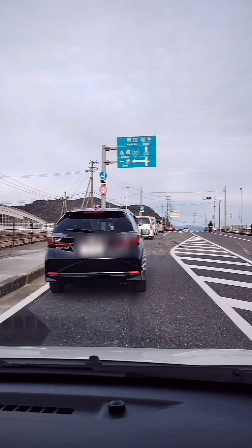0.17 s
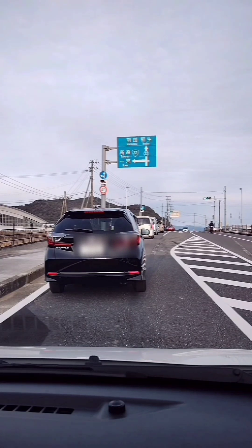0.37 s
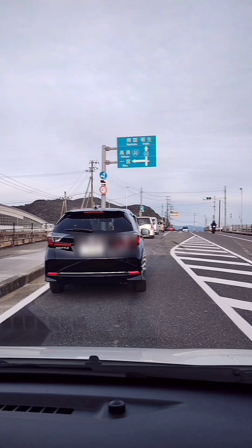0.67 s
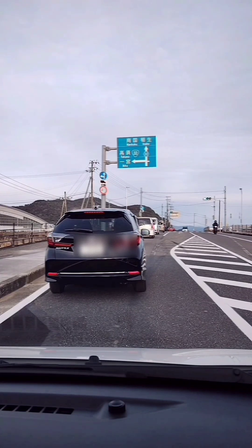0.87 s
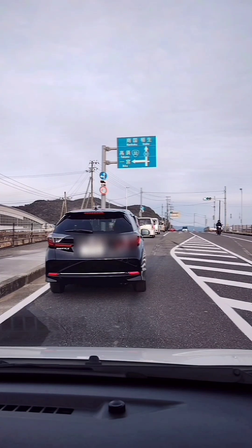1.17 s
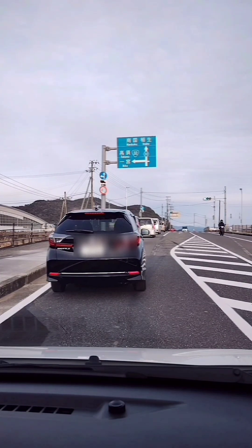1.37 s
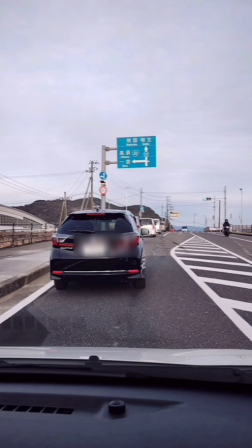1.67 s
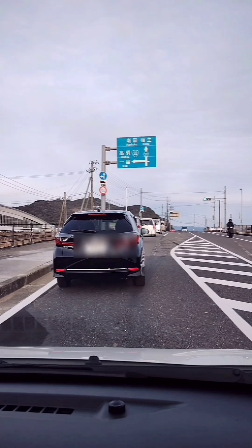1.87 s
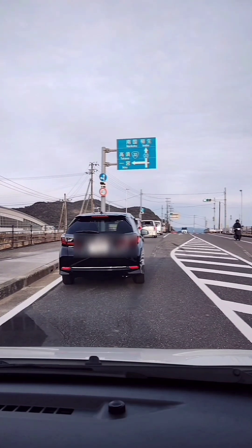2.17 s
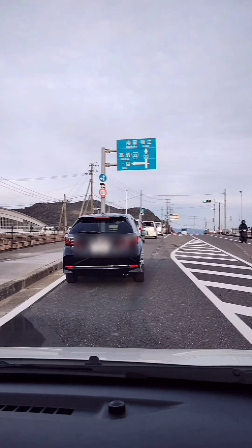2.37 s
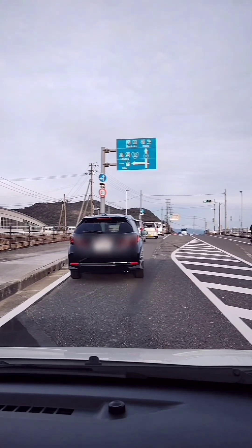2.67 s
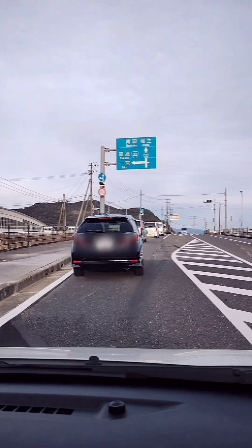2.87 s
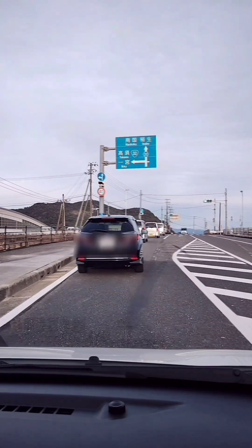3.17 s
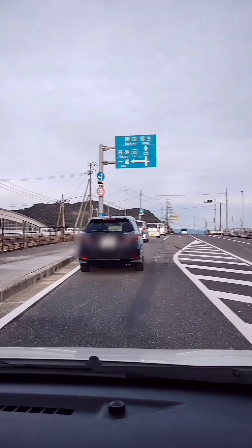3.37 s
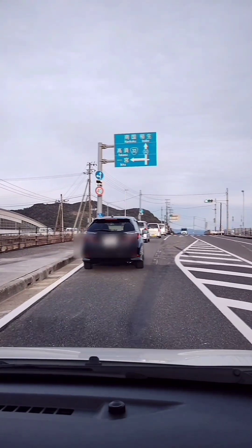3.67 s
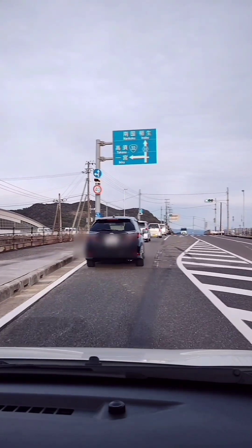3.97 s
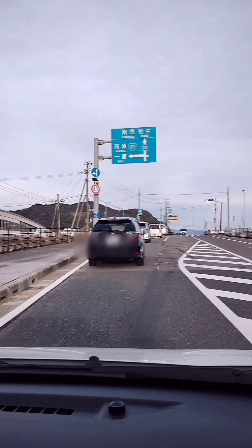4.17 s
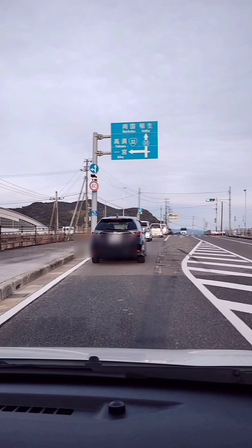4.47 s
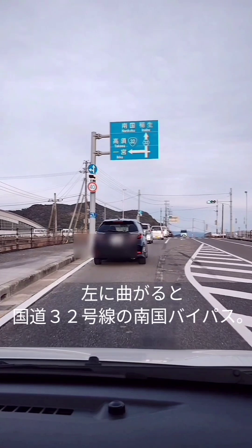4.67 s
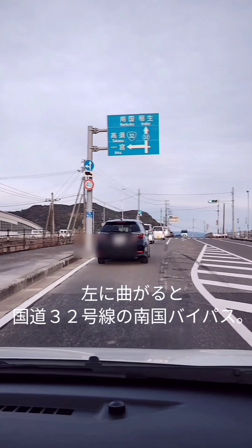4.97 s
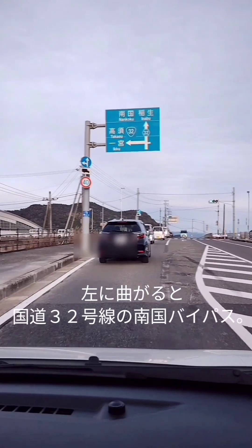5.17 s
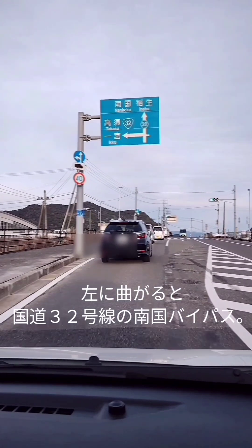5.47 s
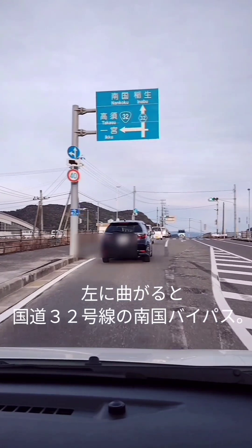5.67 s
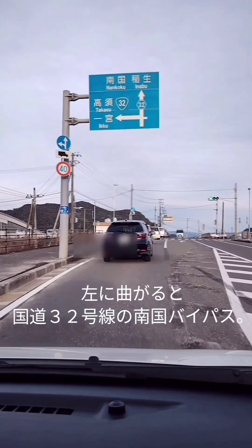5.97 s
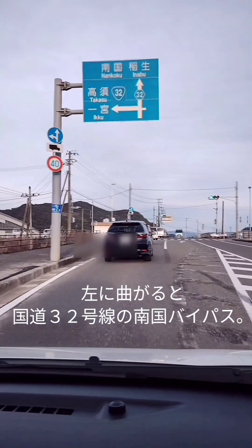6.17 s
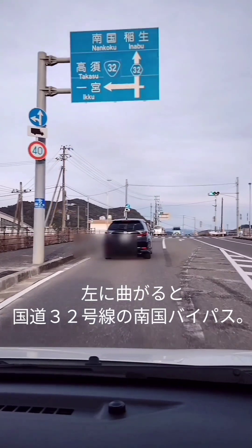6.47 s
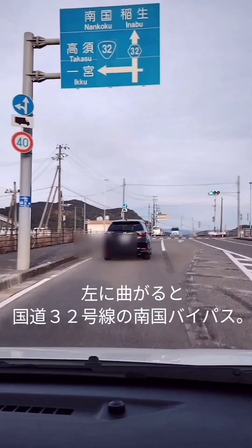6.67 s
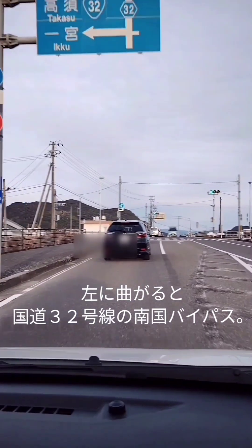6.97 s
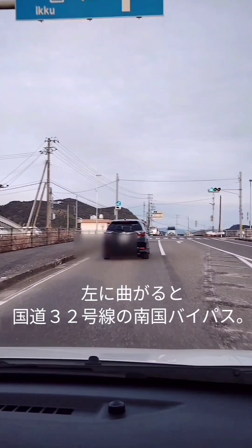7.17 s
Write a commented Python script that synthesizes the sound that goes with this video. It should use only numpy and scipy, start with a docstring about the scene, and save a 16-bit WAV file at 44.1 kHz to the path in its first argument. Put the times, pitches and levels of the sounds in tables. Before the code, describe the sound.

Car cabin heard from the dashboard: quiet idling, a smooth rise in engine pitch, a gear change down in pitch, then rumbling rolling with small ticks.

```python
"""Inside a car that idles, pulls away, changes up and rolls on.
The engine booms as a stack of wandering sine tones, all multiples of its firing rate.
Tyre rumble, drone, roar, hiss and rustle are shaped noise that mostly grows as the car gathers speed.
Engine and blower add steady hum tones, air rushes from the blower, and faint whines and squeaks glide by.
Loose trim ticks and knocks near the phone: short noise bursts ring broad resonances."""
import sys
import numpy as np
from scipy import signal
from scipy.fft import rfft, irfft, next_fast_len
from scipy.io import wavfile
from scipy.ndimage import uniform_filter1d, map_coordinates

SR = 44100
rng = np.random.default_rng(int(sys.argv[2]) if len(sys.argv) > 2 else 0)


def wav_out(sig):
    """Save sig, one row per channel (or a flat mono array), as 16-bit PCM at SR to the path in sys.argv[1]."""
    wavfile.write(sys.argv[1], SR, np.round(np.clip(np.atleast_2d(sig).T, -1, 1) * 32767).astype(np.int16))


N = 323253

# Engine: idling, revving up, pulling away, changing up, rolling on. Each row: time in seconds,
# firing rate in Hz, base level of the low orders in dB, extra swell of the 2nd order in dB.
ENGINE_COURSE = [(0, 24.95, -58, 5), (1.0, 24.65, -51, 0.5), (1.75, 24.36, -60, 11), (1.84, 25.5, -50, -17),
                 (1.94, 28.73, -52, 1), (2.154, 39.41, -52.5, -0.5), (2.27, 42.87, -46.5, 1),
                 (2.42, 44.25, -52.5, 9.5), (2.81, 46.54, -48, 3), (3.08, 49.56, -42.5, -8),
                 (3.35, 53.48, -47.5, 0), (3.85, 57.47, -50.5, -1), (4.37, 61.8, -48, 8.5),
                 (4.62, 64, -42.5, -5.5), (4.87, 57.04, -46.5, 4), (5.0, 55.82, -47, -0.7),
                 (5.31, 54.45, -42.5, 0), (5.63, 51.89, -47, 7.5), (5.83, 50.16, -45, 11),
                 (5.96, 49.23, -39.5, -4), (6.08, 50.16, -39, 2.5), (6.41, 46, -43.5, -3),
                 (7.03, 42.69, -43, 5), (7.33, 42.2, -47.5, -0.5)]
# Single orders of the engine tone swell and sink in level.
# Each row: time in seconds, then extra level of the 1st, 3rd, 4th and 5th order in dB.
ORDER_SWELL = [(0.15, -10, 0, 4.5, 5), (0.7, -6, -4, -0.5, 4.5), (1.15, -1, -7, 4, 2), (1.6, 1, -6, 6, 4),
               (2.0, 9, 1.5, -2.5, -3), (2.4, 4, -5.5, -5.5, 0.5), (2.7, 3, -3, 8, 0.5),
               (2.9, -5, 2.5, -6, 3.5), (3.1, -3.5, 6.5, 2, -5.5), (3.4, 0, -1.5, 5, -9.5),
               (3.8, 2.5, -0.5, 4, 2.5), (4.2, 0.5, -1.5, -1.5, -3.5), (4.5, -5, 3, 9.5, -8.5),
               (4.75, -2, -2.5, 2, -8.5), (5.0, 2.5, 4, 0, -8), (5.3, -1, -1.5, 0.5, -2.5),
               (5.65, -6.5, -12.5, 8, -7.5), (5.9, -4, -2, 0, -2), (6.15, -3.5, -14, -4, 1.5),
               (6.45, 6, 16.5, -10, 4.5), (6.75, 0, -9, -2.5, 6.5), (7.15, -4.5, -14.5, 2, 1.5)]
# Relative strength of the 1st to 6th firing order, one value each in dB.
LOW_ORDERS_DB = [9, 3.5, 5, -4, -9.5, -7]
# How the cabin answers the low orders. Each row: frequency in Hz, gain in dB.
CABIN_BOOM = [(24, -37), (36, -29.5), (45, -15.5), (50, 1.5), (57, 7), (65, 2), (75, 4.5), (88, 9.5),
              (100, 9.5), (115, 13.5), (133, -4), (152, -1), (175, 6), (195, 3.5), (220, 12), (260, 3),
              (320, -8), (390, -6)]
# Weaker orders, fed through the cabin. Each row: multiple of the firing rate, relative level in dB.
UPPER_ORDERS = [(2.5, -12), (3.5, -22.5), (4.5, -23), (6.5, 0.5), (7, 3), (7.5, -5), (8, 3.5), (8.5, -5.5),
                (9, 0.5), (9.5, 1), (10, -0.5), (10.5, -2), (11, 0.5), (12, -1), (13, -0.5)]
# Narrow panel resonances that pick out the upper orders. Each row: frequency in Hz, gain in dB.
PANEL_RING = [(250, -22.5), (330, -23), (360, -16), (390, -21), (424, -10.5), (455, -19.5), (488, -16.5),
              (520, -25), (570, -26.5), (625, -21.5), (670, -18), (710, -22.5), (750, -31), (800, -22),
              (850, -31)]
FIRST_TURN = 0.402  # share of a firing cycle already gone at the start
THROB = 0.15  # share by which each firing swells the roar and the hiss

# Road noise, before each layer's own offset. Each row: time in seconds, body rumble in dB,
# tyre drone in dB, cabin roar in dB.
ROAD_LEVEL = [(0, -39, -51, -60.5), (.35, -45, -55, -61), (.75, -41.5, -45.5, -57), (1.22, -39.5, -47, -60),
              (1.75, -40.5, -47.5, -59), (2.12, -33, -43.5, -52.5), (2.4, -34, -44, -47.5),
              (2.86, -42, -41, -47.5), (3.18, -35.5, -35, -46), (3.49, -28.5, -39, -46),
              (4.08, -22.5, -36.5, -43.5), (4.33, -23, -35.5, -44.5), (4.65, -25, -30, -40),
              (5.16, -25, -28.5, -40), (5.7, -21.5, -29, -41.5), (6.12, -20, -27.5, -41.5),
              (6.5, -22, -28.5, -41.5), (7.33, -27, -28, -43.5)]
# Engine-bay and tyre hiss. Each row: time in seconds, level in dB before the dips.
HISS_COURSE = [(0.0, -74.5), (1.86, -75.5), (2.08, -70.5), (2.33, -67), (2.92, -62.5), (3.76, -61),
               (4.45, -58), (4.88, -60), (5.33, -57.5), (5.59, -59.5), (6.19, -61.5), (6.41, -59.5),
               (7.0, -61), (7.33, -61)]
# How much the bumps are felt as the car gathers speed. Each row: time in seconds, share from 0 to 1.
BUMP_SHARE = [(1.9, .15), (3.5, 1)]
# Colour of the body rumble. Each row: frequency in Hz, relative strength in dB per Hz.
RUMBLE_COLOUR = [(15, -58.5), (25, -20.5), (32, -18.5), (45, -9.5), (62, -3.5), (76, 1.5), (95, 4),
                 (118, -3), (150, -9), (200, -39), (330, -120)]
# Colour of the tyre drone. Each row: frequency in Hz, relative strength in dB per Hz.
DRONE_COLOUR = [(71, -36.5), (120, -11), (145, 1.5), (189, -6.5), (232, -9), (255, -5.5), (340, -35),
                (440, -62), (750, -120)]
# Colour of the cabin roar. Each row: frequency in Hz, relative strength in dB per Hz.
ROAR_COLOUR = [(160, -27), (270, -5), (328, -7.5), (388, -9), (423, -4.5), (459, -8), (488, -9.5),
               (567, -16), (659, -11.5), (737, -18.5), (800, -13.5), (884, -19.5), (1200, -34.5),
               (1560, -53), (2640, -120)]
# Hiss, coloured by bulkhead and dashboard. Each row: frequency in Hz, relative strength in dB per Hz.
HISS_COLOUR = [(470, -30.5), (800, -6), (885, -12.5), (996, -11.5), (1080, -8), (1180, -13.5),
               (1280, -11.5), (1680, -14), (2040, -14), (2500, -19.5), (2720, -18.5), (3160, -25),
               (3410, -24.5), (5160, -40.5), (6000, -41.5), (7800, -69.5), (13200, -120)]
# Colour of the rustling trim. Each row: frequency in Hz, relative strength in dB per Hz.
RUSTLE_COLOUR = [(2650, -20), (4500, -0.5), (5140, -8), (6500, -6), (7710, -1.5), (8420, -1.5),
                 (9290, -5.5), (11100, -17), (14500, -22.5)]
# Fits of rustling in the trim. Each row: middle in seconds, peak in dB, half length in seconds.
RUSTLE_FITS = [(0.947, -69.5, 0.016), (2.174, -81.5, 0.016), (2.241, -76.5, 0.008), (2.298, -66.5, 0.011),
               (2.86, -82.5, 0.11), (3.18, -88, 0.073), (3.385, -81, 0.021), (3.546, -81.5, 0.009),
               (3.946, -77.5, 0.052), (4.23, -78, 0.011), (4.395, -77, 0.031), (4.533, -76.5, 0.024),
               (4.611, -79.5, 0.15), (4.643, -80, 0.05), (4.732, -72, 0.021), (4.835, -84.5, 0.0076),
               (4.925, -74.5, 0.014), (5.009, -85, 0.0097), (5.106, -79, 0.017), (5.177, -72, 0.029),
               (5.334, -79.5, 0.0097), (5.397, -82.5, 0.0035), (5.503, -75, 0.04), (5.699, -77.5, 0.0098),
               (5.768, -79, 0.0058), (5.83, -90, 0.0068), (5.962, -74.5, 0.012), (6.115, -80, 0.011),
               (6.299, -71, 0.0099), (6.409, -76, 0.028), (6.519, -81.5, 0.026), (6.7, -82, 0.11),
               (7.016, -85.5, 0.028), (7.252, -85.5, 0.055)]
# The treble dips briefly. Each row: middle in seconds, depth in dB, half length in seconds.
TREBLE_DIPS = [(4.877, 12.5, 0.018), (5.679, 4.5, 0.023)]
# The trim's steady rustle at the reference roar (dB), its rise in dB per dB of roar, its random swing (dB).
RUSTLE_DB, RUSTLE_FOLLOWS, RUSTLE_WANDERS_DB = -86, 0.55, -2.4
ROAR_REF_DB = -46

# Trim contacts. Each row: time in seconds, tick level in dB and knock level in dB (both before the
# resonances), left-right difference of the tick in dB, share of rattle 0-1, share of the bright clip 0-1.
TRIM_CONTACTS = [(0.9416, -55.5, -33, -3, 0, 0), (1.014, -51.5, -38.5, -4, 0.4, 0.7),
                 (2.238, -59.5, -43.5, -5, 0.2, 0.2), (2.294, -46, -45, -5, 0.03, 0.4),
                 (2.314, -60, -52.5, 5, 0.2, 0.5), (2.388, -70, -44, 0, 0.2, 0.1),
                 (3.177, -55, -40, -7, 0.3, 0.1), (3.5624, -77, -35.5, -7.5, 0.4, 0.1),
                 (5.4764, -65, -38.5, -2, 0.1, 0.1), (6.2415, -42.5, -30.5, -6.5, 0.2, 0),
                 (6.2868, -58.5, -42.5, -5, 0.3, 0.2), (7.2801, -54, -46.5, -4, 0, 0.1)]
# Resonances of the hard trim. Each row: centre in Hz, width in Hz, gain in dB.
TRIM_MODES = [(4230, 800, -3), (7060, 210, 7.5), (8140, 1900, -0.5), (13500, 3000, -14.5)]
# A small, brighter clip in the trim. Each row: centre in Hz, width in Hz, gain in dB.
CLIP_MODES = [(10500, 2600, 1)]
# Resonances of the panel behind the trim. Each row: centre in Hz, width in Hz, gain in dB.
PANEL_MODES = [(430, 100, 4.5), (855, 310, -5.5), (1360, 110, -9), (1890, 130, -10.5), (2770, 630, -14)]
# Seconds for the panel's blow and its buzzing tail to fall by 60 dB; the tail's share.
THUD_T60_S, TAIL_T60_S, TAIL_SHARE = 0.036, 0.28, 0.41

# Faint whines, squeaks and short booms of the body. Each row: start in seconds, end in seconds,
# first pitch in Hz, last pitch in Hz, level in dB.
BODY_WHINES = [(3.05, 3.75, 63, 76, -43), (3.76, 4.2, 88, 101, -35), (4.526, 4.721, 155, 140, -36),
               (4.294, 4.85, 785, 805, -59), (5.711, 6.6, 799.6, 775, -59), (3.795, 3.82, 3340, 3335, -76),
               (3.875, 3.905, 3320, 3330, -77), (3.91, 3.935, 3385, 3385, -77),
               (4.165, 4.192, 3345, 3360, -69), (4.205, 4.242, 3320, 3375, -68),
               (4.247, 4.27, 3300, 3290, -73), (4.335, 4.36, 3335, 3335, -76), (4.8, 5.0, 2010, 2055, -70),
               (5.075, 5.225, 2108, 2116, -67), (5.25, 5.375, 2105, 2110, -68),
               (5.42, 5.55, 2085, 2110, -71), (5.57, 5.65, 2075, 2060, -72), (6.18, 6.3, 1990, 1960, -71),
               (6.4, 6.68, 1970, 1925, -74), (6.7, 6.88, 1910, 1895, -73)]
# Steady hum tones of engine and blower. Each row: frequency in Hz, level in dB.
HUM_TONES = [(221, -61), (268, -58.5), (534, -66.5), (802, -77)]
# Colour of the blower's air. Each row: frequency in Hz, relative strength in dB per Hz.
VENT_COLOUR = [(90, -27), (150, -6.5), (270, 2), (340, -15), (520, -4.5), (590, -21.5), (810, -13),
               (900, -20.5), (1300, -21), (3000, -41.5), (4500, -67)]
VENT_DB = -56

# How alike left and right noise are. Each row: frequency in Hz, likeness from -1 to 1.
EAR_LIKENESS = [(60, 0.99), (180, 0.99), (550, 0.69), (1650, -0.16), (4970, 0.05), (15000, 0.23)]
# Balance of the cabin sound. Each row: frequency in Hz, left-right difference in dB.
CABIN_BALANCE = [(60, 1.5), (180, 1.5), (550, 1.5), (1650, -1.5), (4970, -3.5), (9000, -6.5), (15000, 1)]
# The level drops briefly. The row: middle in seconds, depth in dB, half length in seconds.
LEVEL_DROP = (0.9, 11, 0.013)
# Colour of the microphone hiss. Each row: frequency in Hz, relative strength in dB per Hz.
MIC_COLOUR = [(1500, -27), (3000, 8.5), (8000, -2.5), (12000, 6), (16000, 2.5)]
TOP_HZ = 15780  # the phone's band limit


def amp(db):
    """Turn decibels into a plain gain."""
    return 10 ** (np.asarray(db) / 20)


def unit(x):
    """Scale to an rms of 1."""
    return x / np.sqrt(np.mean(x ** 2) + 1e-20)


def along(points, hz):
    """Read a curve of (Hz, value) points, joined on a log frequency axis."""
    f, v = np.transpose(points)
    return np.interp(np.log(hz + 1), np.log(f + 1), v)


def curves(rows):
    """One value per sample for each column after the time."""
    s, *cols = np.transpose(rows)
    return [np.interp(np.arange(N) / SR, s, c) for c in cols]


def bell(s, half):
    """A smooth hump in time."""
    return np.exp(-((np.arange(N) / SR - s) / half) ** 2)


def wobble(rate):
    """A smooth random curve, rate knots a second."""
    coarse = np.arange(0, N + 32, 32)
    knots = rng.standard_normal(int(N * rate / SR) + 4)
    smooth = map_coordinates(knots, [coarse * rate / SR])
    return np.interp(np.arange(N), coarse, smooth)


def filtered(x, response, mirror="odd"):
    """x times a complex response of frequency; the ends are mirrored so that they do not click."""
    edge = 4096
    x = np.pad(np.atleast_2d(x), ((0, 0), (edge, edge)), mode="reflect", reflect_type=mirror)
    m = next_fast_len(N + SR)
    spectrum = rfft(x, m) * response(np.fft.rfftfreq(m, 1 / SR))
    return irfft(spectrum, m)[:, edge:edge + N]


def resonant(modes):
    """The response of a few broad modes, each ringing on after a blow; their signs alternate."""
    def response(f):
        return sum((-1) ** k * amp(db) * 1j * f * w / (c * c - f * f + 1j * f * w)
                   for k, (c, w, db) in enumerate(modes))
    return response


def rush(colour, patchy_db, count=(10, 5)):
    """Coloured stereo noise with patches of random gain, smoothed over count = (bins high, frames long)."""
    z = signal.stft(rng.standard_normal((2, N + 1024)), nperseg=512)[2]
    field = rng.standard_normal(z.shape[1:])
    field = uniform_filter1d(field, size=count[0], axis=0)
    field = uniform_filter1d(field, size=count[1], axis=1)
    pair = signal.istft(z * amp(patchy_db * unit(field)), nperseg=512)[1][:, 512:512 + N]

    def mid_side(hz):
        # the more alike the two sides, the more goes to the middle
        angle = np.arccos(np.clip(along(EAR_LIKENESS, hz), -1, 1)) / 2
        return amp(along(colour, hz)) * [np.cos(angle), np.sin(angle)]

    mid, side = filtered(pair, mid_side, mirror="even")
    return np.array([mid + side, mid - side]) / np.sqrt(np.mean(mid ** 2))


def tone(turns, db, shaky_db, drift, haste=8):
    """A sine that follows a count of turns; level and phase wander, haste knots a second."""
    level = np.sqrt(2) * amp(db + shaky_db * wobble(haste))
    return -level * np.cos(2 * np.pi * turns + drift * wobble(haste))


def count_firings():
    """The running count of firings, summed from the firing rate."""
    return FIRST_TURN + np.cumsum(curves(ENGINE_COURSE)[0]) / SR


def engine():
    """Low orders add up to one throb per firing and swell at the cabin's booms; weaker orders lie above."""
    hz, load_db, second_db = curves(ENGINE_COURSE)
    first_db, third_db, fourth_db, fifth_db = curves(ORDER_SWELL)
    swells = [first_db, second_db, third_db, fourth_db, fifth_db, 0]
    firings = count_firings()
    out = np.zeros(N)
    for order, (db, swell_db) in enumerate(zip(LOW_ORDERS_DB, swells), start=1):
        boom_db = along(CABIN_BOOM, order * hz)
        out += tone(order * firings, load_db + db + swell_db + boom_db, shaky_db=1, drift=.22)
    roar_db = curves(ROAD_LEVEL)[2]
    for order, db in UPPER_ORDERS:
        # the bass passes the bulkhead more easily
        cabin_db = 3 if order < 6 else along(PANEL_RING, order * hz)
        out += tone(order * firings, roar_db + cabin_db + db, shaky_db=2.8, drift=0.35, haste=6)
    return out


def road(bumps, uneven, throb):
    """Bumps in the tarmac shake rumble, drone and roar together; each firing swells the roar."""
    rumble_db, drone_db, roar_db = curves(ROAD_LEVEL)
    rumble = amp(rumble_db - 4.5 + 0.19 * bumps) * rush(RUMBLE_COLOUR, patchy_db=0.0)
    drone = amp(drone_db - 3.5 + 0.13 * bumps) * rush(DRONE_COLOUR, patchy_db=1.16)
    roar_gain = amp(roar_db - 2.5 + 1.0 * bumps + 0.13 * uneven) * throb
    return rumble + drone + roar_gain * rush(ROAR_COLOUR, patchy_db=-0.3)


def hiss_and_rustle(bumps, uneven, throb):
    """Hiss and rustle, uneven in level; shaking trim rustles in fits over a steady rustle and stirs the hiss."""
    roar_db = curves(ROAD_LEVEL)[2]
    dip_db = sum(db * bell(s, half) for s, db, half in TREBLE_DIPS)
    hiss_db = curves(HISS_COURSE)[0] - dip_db
    follow_db = RUSTLE_FOLLOWS * (roar_db - ROAR_REF_DB)
    steady = amp(RUSTLE_DB + follow_db + RUSTLE_WANDERS_DB * wobble(15) - dip_db)
    fits = sum(amp(db) * bell(s, half) for s, db, half in RUSTLE_FITS)
    # what shakes the trim also stirs the hiss
    shake_db = 20 * np.log10((steady + fits) / steady)
    hiss_gain = amp(hiss_db + 0.2 * shake_db + 0.25 * bumps + 2.0 * uneven) * throb
    rustle_gain = steady * amp(7.8 * uneven) + fits * amp(0.83 * uneven)
    hiss = hiss_gain * rush(HISS_COLOUR, patchy_db=1.4, count=(2, 10))
    return hiss + rustle_gain * rush(RUSTLE_COLOUR, patchy_db=2.0)


def trim():
    """Each contact is a snap and a rattle in the hard trim, and a dull blow on the panel behind it."""
    plain, bright, knocks = np.zeros((3, 2, N + SR))
    t = np.arange(SR // 5) / SR
    snap = np.exp(np.minimum((t - .014) / .0012, (.014 - t) / .0045))  # fast rise, slower fall
    rattle = np.exp(-((t - .022) / .009) ** 2)
    blow = amp(-60 * (t - .014) / THUD_T60_S)
    tail = TAIL_SHARE * amp(-60 * (t - .014) / TAIL_T60_S)
    thud = np.clip((t - .013) / .004, 0, 1) * (blow + tail)
    for s, db, knock_db, pan_db, loose, clip_share in TRIM_CONTACTS:
        at = round((s - .013) * SR)
        span = slice(at, at + len(t))
        left, right, both = rng.standard_normal((3, len(t)))
        sides = np.array([left, right])
        shape = (1 - loose) * snap + loose * rattle
        tick = amp(db + np.array([[pan_db / 2], [-pan_db / 2]])) * shape * sides
        plain[:, span] += (1 - clip_share) * tick
        bright[:, span] += clip_share * tick
        knocks[:, span] += amp(knock_db + 2.5) * thud * (both + 1.6 * sides)

    def soft_panel(hz):
        # the padding takes the edge off
        return resonant(PANEL_MODES)(hz) / (1 + 1j * hz / 3000) ** 2

    ticks = filtered(plain[:, :N], resonant(TRIM_MODES)) + filtered(bright[:, :N], resonant(CLIP_MODES))
    return ticks + filtered(knocks[:, :N], soft_panel)


def whines():
    """Faint whines, squeaks and short booms glide in pitch and fade in and out."""
    t = np.arange(N) / SR
    out = np.zeros(N)
    for start, end, first_hz, last_hz, db in BODY_WHINES:
        fade = np.clip(np.minimum(t - start, end - t) / (.2 * (end - start)), 0, 1)
        turns = np.cumsum(np.interp(t, [start, end], [first_hz, last_hz])) / SR
        out += fade * tone(turns, db, shaky_db=2, drift=.45, haste=first_hz ** .47)
    return out


def hums_and_air():
    """Air from the blower is patchy noise; the hum of engine and blower is a few pitches that waver slightly."""
    t = np.arange(N) / SR
    air = amp(VENT_DB) * rush(VENT_COLOUR, patchy_db=1.2)
    return air + sum(tone(hz * t, db, shaky_db=1.8, drift=.35) for hz, db in HUM_TONES)


def scene():
    """All but the trim contacts share one brief drop in level and a left-right balance."""
    bumps = curves(BUMP_SHARE)[0] * wobble(7.1)
    uneven = np.tanh(1.7 * wobble(85))
    throb = 1 + THROB * np.cos(2 * np.pi * count_firings())
    cabin = engine() + road(bumps, uneven, throb) + hiss_and_rustle(bumps, uneven, throb)
    cabin = cabin + whines() + hums_and_air()
    middle, depth_db, half = LEVEL_DROP
    cabin = cabin * amp(-depth_db * bell(middle, half))
    balanced = filtered(cabin, lambda hz: amp(along(CABIN_BALANCE, hz) * [[.5], [-.5]]))
    return balanced + trim()


def record(dry):
    """The phone adds a faint hiss of its own and keeps nothing above its band limit."""
    hiss_db = -91.0 + 4.9 * np.tanh(1.4 * wobble(78))
    hiss = amp(hiss_db) * rush(MIC_COLOUR, patchy_db=8.0)
    return filtered(dry + hiss, lambda hz: hz < TOP_HZ)


dry = scene()
out = record(dry)
wav_out(out)
```